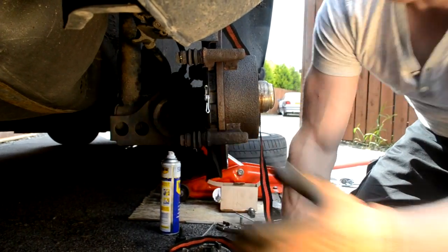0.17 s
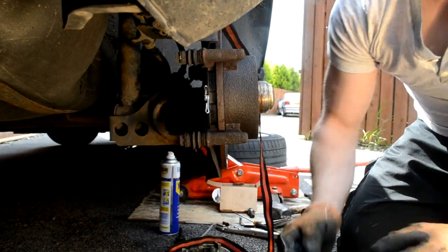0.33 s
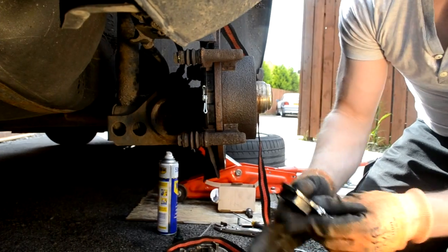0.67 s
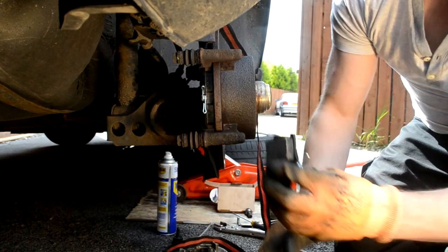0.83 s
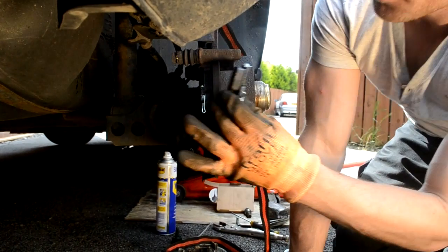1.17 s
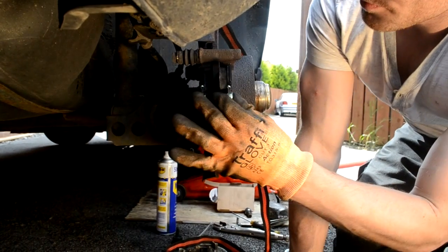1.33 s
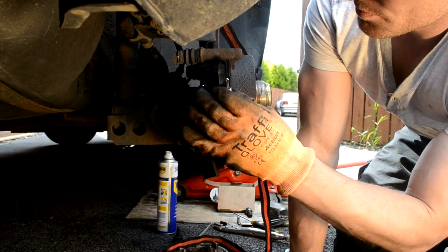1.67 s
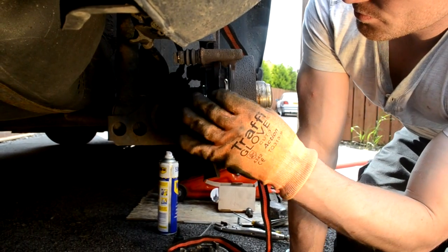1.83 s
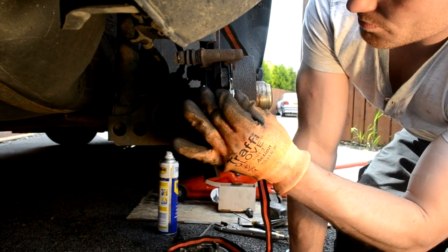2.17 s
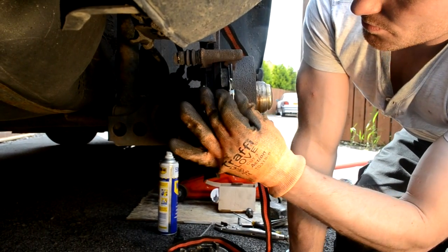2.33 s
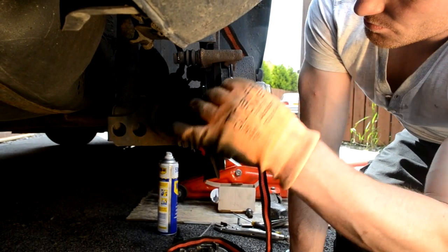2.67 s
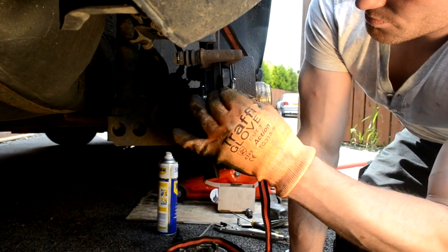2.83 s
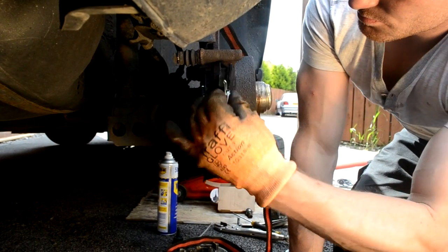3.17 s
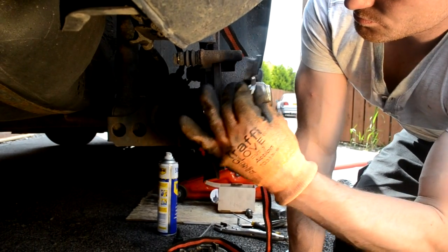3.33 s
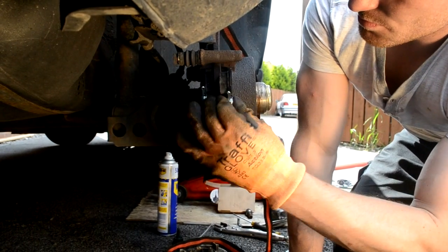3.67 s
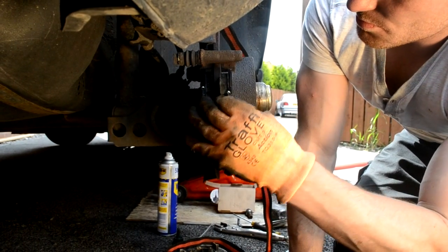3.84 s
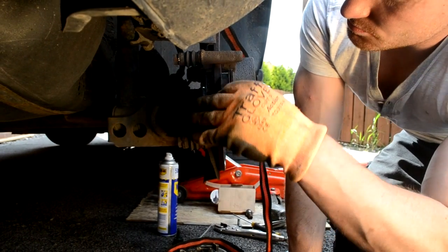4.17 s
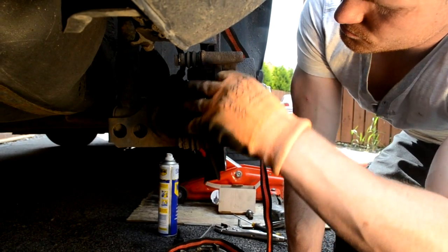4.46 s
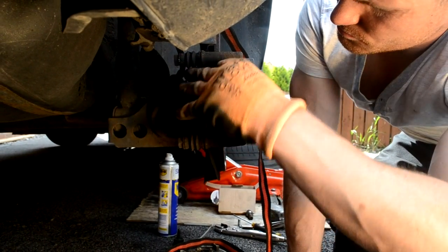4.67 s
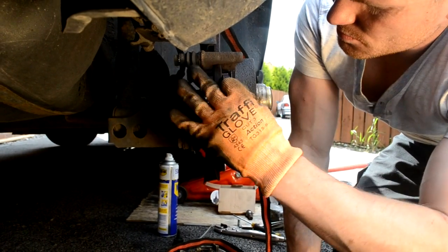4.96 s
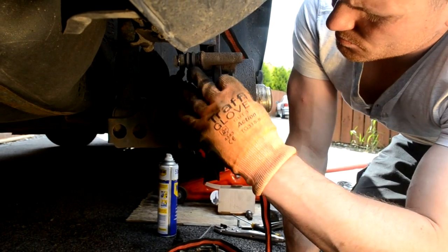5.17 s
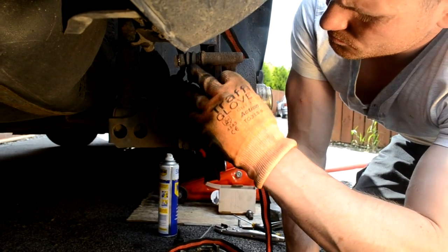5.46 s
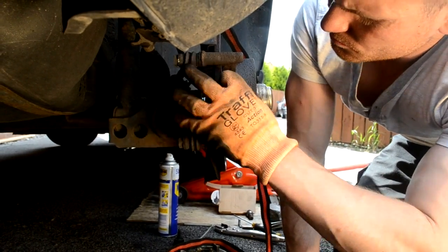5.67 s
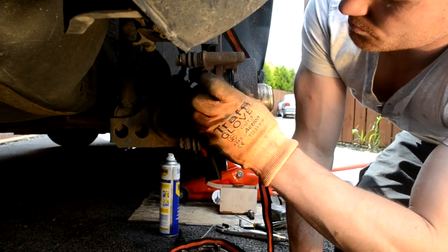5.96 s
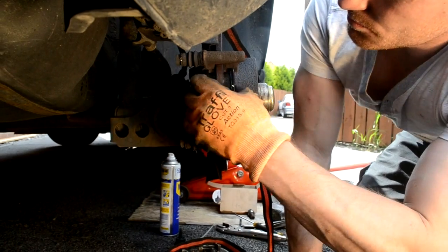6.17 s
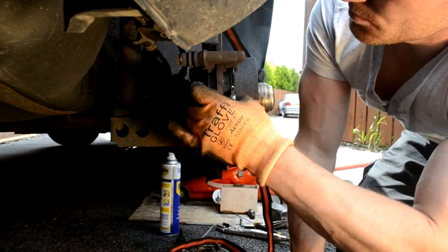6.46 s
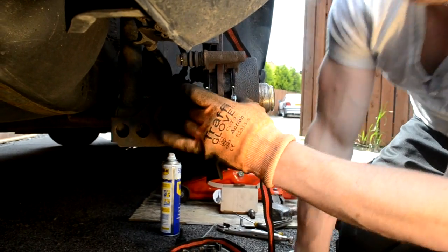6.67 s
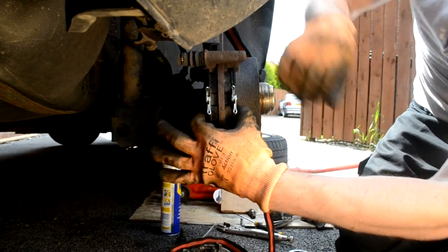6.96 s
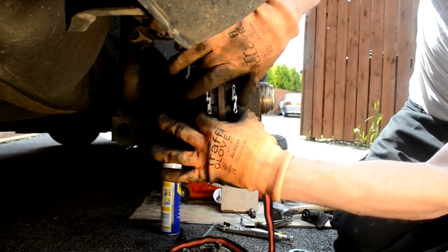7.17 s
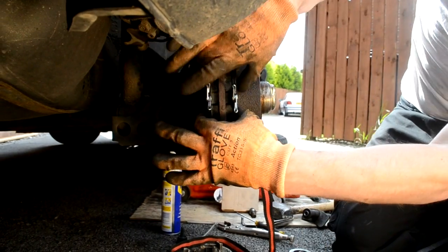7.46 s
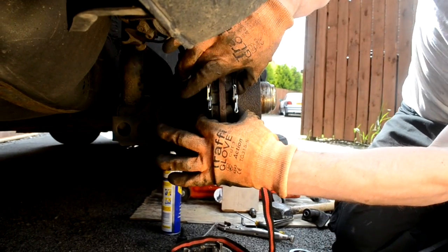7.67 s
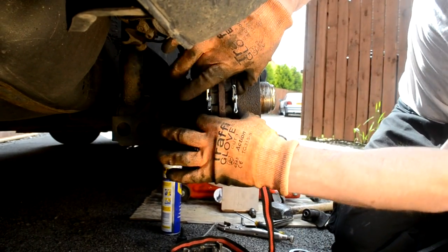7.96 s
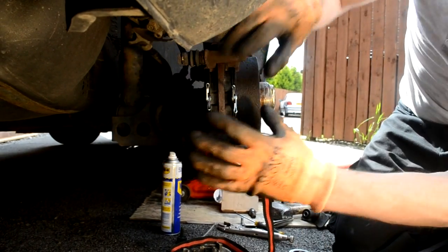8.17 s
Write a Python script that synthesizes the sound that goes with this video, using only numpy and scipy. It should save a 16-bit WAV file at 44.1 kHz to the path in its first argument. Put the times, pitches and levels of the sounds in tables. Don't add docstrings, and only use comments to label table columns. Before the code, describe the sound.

Brake pads clink, scrape and knock into a cast iron carrier in short groups, then a spring clip snaps loudly, with birdsong and faint suburban hum.

```python
import sys
import numpy as np
from scipy import signal
from scipy.fft import rfft, irfft, next_fast_len
from scipy.io import wavfile
from scipy.ndimage import uniform_filter1d, map_coordinates

SR = 44100
rng = np.random.default_rng(int(sys.argv[2]) if len(sys.argv) > 2 else 0)


def gain_from_db(level_db):
    decades = np.asarray(level_db, float) / 20
    return 10 ** decades


def persist_wave(psi):
    counts = np.round(np.clip(psi, -1, 1) * 32767).astype(np.int16)
    wavfile.write(sys.argv[1], SR, np.atleast_2d(counts).T)


N = 366471


def unit(x):
    return x / np.sqrt(np.mean(x ** 2) + 1e-20)


def along(points, hz):
    f, v = np.transpose(points)
    return np.interp(np.log(hz + 1), np.log(f + 1), v)


def wobble(rate):
    knots = rng.standard_normal(int(N * rate / SR) + 4)
    return map_coordinates(knots, [np.arange(N) * rate / SR])


def bumps(rows, steep):
    t = np.arange(0, N + 16, 16) / SR
    swell = np.zeros(len(t))
    for s, length, db in rows:
        swell += gain_from_db(db) * np.exp(-(steep * (t - s) / length) ** 4)
    return np.interp(np.arange(N) / SR, t, swell)


def coloured(x, spectrum):
    m = next_fast_len(len(x) + 8192)
    gain = gain_from_db(along(spectrum, np.fft.rfftfreq(m, 1 / SR)))
    return unit(irfft(rfft(x, m) * gain, m)[:len(x)])


def band(x, low_hz, high_hz):
    edges = [low_hz, min(high_hz, 20000)]
    return signal.sosfilt(signal.butter(4, edges, "band", fs=SR, output="sos"), x)


def rush(spectrum, patchy_db, grain_db):
    noise = rng.standard_normal(N) * gain_from_db(grain_db * wobble(700))
    z = signal.stft(noise, nperseg=512)[2]
    field = uniform_filter1d(rng.standard_normal(z.shape), 6, 0)
    field = uniform_filter1d(field, 10, 1)
    patchy = signal.istft(z * gain_from_db(patchy_db * unit(field)), nperseg=512)[1]
    return coloured(patchy[:N], spectrum)


def add(track, s, sound, db):
    part = track[max(round(s * SR), 0):][:len(sound)]
    part += gain_from_db(db) * sound[:len(part)] / np.abs(sound).max()


def grit(grind, rough_db):
    u = np.arange(round(5 * grind * SR)) / SR / grind
    spikes = rng.standard_normal(len(u) // 40 + 1).repeat(40)[:len(u)]
    envelope = np.minimum(3 * u, 1) ** 1.4 * gain_from_db(-26 * np.maximum(u - .7, 0))
    return rng.standard_normal(len(u)) * gain_from_db(rough_db * spikes) * envelope


def ring(modes, force, treble_db, corner_hz, spread_db, damp):
    hz, db, t60 = np.transpose(modes)[:, :, None]
    t60 = t60 * damp
    t = np.arange(round(min(.36, t60.max()) * SR)) / SR
    luck = rng.standard_normal((2, len(modes), 1))
    hz = hz * (1 + .002 * luck[1])
    bins = np.round(hz / 2).astype(int)
    push = np.abs(rfft(force, SR // 2))[bins] / np.linalg.norm(force)
    tilt_db = treble_db / (1 + (corner_hz / hz) ** 4)
    level = gain_from_db(db + tilt_db + spread_db * luck[0]) / np.maximum(push, .25)
    body = np.sum(level * gain_from_db(-60 * t / t60) * np.sin(2 * np.pi * hz * t), 0)
    fade = (1 - np.exp(-t / .0015)) * np.cos(np.pi / 2 * t / t[-1])
    return signal.fftconvolve(force, body * fade)


def burst(envelope, spectrum):
    n = len(envelope)
    z = rfft(rng.standard_normal(n) * envelope, 2 * n)
    wide = round(2 * n / SR * 350)
    even = irfft(z / np.sqrt(uniform_filter1d(np.abs(z) ** 2, wide)))[:n]
    return coloured(even, spectrum)


def contacts(events, modes, corner_hz, spread_db, damp, dense_db, dense_t60, lift_db, gain_db):
    out, t = np.zeros(N), np.arange(SR // 5) / SR
    hz, db, _ = np.transpose(modes)
    for s, peak_db, treble_db, grind in events:
        force = grit(max(grind, .002), rough_db=2.5)
        treble_db = treble_db + lift_db
        sound = np.zeros(SR)
        add(sound, 0, ring(modes, force, treble_db, corner_hz, spread_db, damp), 0)
        tilted_db = db + treble_db / (1 + (corner_hz / hz) ** 4)
        tone = [(hz[0] * .6, -45), *zip(hz, tilted_db), (12500, -62)]
        fading = gain_from_db(-60 * t / dense_t60) * (1 - np.exp(-t / (0.4 * grind)))
        fed = np.sqrt(np.abs(signal.fftconvolve(force ** 2, fading ** 2)[:len(t)]))
        add(sound, 0, burst(fed, sorted(tone)), dense_db)
        add(out, s - 0.23 * grind, sound, peak_db + gain_db)
    return out


# hz [Hz], density_db [dB per Hz]
SUBURB = [(15, -42.5), (25, -7.5), (131, -2.5), (174, -0.5), (367, -0.5), (682, -1), (1030, -0.5),
          (1480, -11.5), (2480, -15), (2970, -1), (3380, -19), (4380, -10), (4860, -22.5), (9030, -38),
          (12000, -58.5), (15600, -70), (22000, -120)]


def suburb():
    level_db = -59 + 0.16 * wobble(8.1)
    return gain_from_db(level_db) * rush(SUBURB, patchy_db=1.5, grain_db=0.5)


# start_s [s], level_db [dB]
RUB = [(0.0, -62), (1.09, -60.5), (1.76, -64), (5.46, -62.5), (5.78, -51.5), (6.5, -62.5), (7.06, -58.5),
       (8.31, -62.5)]
# middle_s [s], length_s [s], level_db [dB]
STROKES = [(.03, 0.0065, -62), (.095, 0.032, -60.5), (.515, 0.025, -53.5), (.668, 0.0065, -62),
           (5.005, 0.028, -61), (6.885, .005, -57), (6.94, .008, -61), (7.495, 0.012, -61),
           (8.012, 0.0092, -61.5), (8.17, 0.0046, -56), (.46, 0.051, -67), (0.627, 0.032, -55),
           (0.724, 0.023, -62), (1.025, 0.064, -59.5), (1.099, 0.052, -52), (1.261, 0.059, -56),
           (2.043, 0.088, -68), (2.693, 0.042, -58.5), (3.217, 0.057, -62), (4.662, 0.046, -46),
           (4.899, 0.037, -53), (5.66, 0.027, -46.5), (6.134, 0.041, -63), (6.188, 0.029, -52.5),
           (6.266, 0.018, -47.5), (6.439, 0.082, -61), (6.72, 0.12, -52.5), (6.98, 0.12, -64.5),
           (7.252, 0.27, -63), (8.24, 0.014, -52.5)]
# hz [Hz], density_db [dB per Hz]
RUSTLE = [(880, -29), (1500, -5.5), (1940, -4.5), (2220, -2.5), (3580, -7.5), (6090, -10.5), (9490, -18),
          (11200, -33.5), (12500, -68), (16200, -99), (22000, -120)]
# hz [Hz], density_db [dB per Hz]
DRAG = [(290, -40.5), (500, -11), (570, 3), (1340, 6.5), (1890, -2.5), (4000, -14), (5200, -51.5),
        (8800, -120)]


def gloves():
    effort_db = np.interp(np.arange(N) / SR, *np.transpose(RUB))
    rustle_db = -62.5 + 0.92 * (effort_db + 58)
    rustle = gain_from_db(rustle_db) + bumps(STROKES, steep=2.1)
    rustle *= rush(RUSTLE, patchy_db=3.0, grain_db=1.5)
    drag = gain_from_db(effort_db - 1.5) * rush(DRAG, patchy_db=1.5, grain_db=1.5)
    return rustle + drag


# start_s [s], peak_db [dB]
POPS = [(.07, -36.5), (0.187, -36), (0.344, -32), (.37, -34.5), (.392, -36), (0.407, -32.5), (0.648, -38.5),
        (.715, -36.5), (0.842, -29.5), (1.104, -27.5), (1.351, -17.5), (1.559, -31), (3.764, -21.5),
        (3.921, -28.5), (4.095, -30), (4.177, -25), (4.992, -34),]
# middle_s [s], length_s [s], level_db [dB]
GUSTS = [(.42, 0.78, -95), (1.05, 0.96, -62), (4.0, 0.5, -65.5), (5.05, 0.38, -59.5), (7.4, 0.31, -73)]
# hz [Hz], density_db [dB per Hz]
GUST = [(12, -42.5), (20, -7.5), (44, -5), (86, 0), (145, -6), (400, -21), (520, -36), (880, -120)]


def wind():
    calm_db = -71
    lumps = gain_from_db(4 * wobble(22))
    buffeting = unit(lumps * rush(GUST, patchy_db=2.5, grain_db=4.0))
    out = (gain_from_db(calm_db) + bumps(GUSTS, steep=1.6)) * buffeting
    for s, db in POPS:
        hz = 89.7 + 6.1 * (db + 35.5)
        u = np.linspace(0, 3, round(3 * SR / hz))
        add(out, s + 0.01276, np.sin(2 * np.pi * u) * u * np.exp(-3.5 * u), db - 11.5)
    return band(out, low_hz=35, high_hz=900)


# hz [Hz], t60_s [s]
ARCH = [(200, 0.6), (1500, 0.22), (5000, 0.22), (11000, 0.059)]


def arch(x):
    hz, t, z = signal.stft(rng.standard_normal(SR // 2), SR, nperseg=256)
    decay = gain_from_db(-60 * t / along(ARCH, hz)[:, None])
    tail = signal.istft(z * decay, SR, nperseg=256)[1]
    return signal.fftconvolve(np.pad(x, (300, 0)), tail / np.linalg.norm(tail))[:N]


FALL = [(0, 1.4), (.15, 1.3), (.3, 1.0), (.55, .853), (1, .653)]
HOOK = [(0, .96), (.12, 1.05), (.8, .965), (1, 0.85)]
FLICK = [(0, .93), (.35, 1.0), (.48, 1.19), (.62, .91), (1, 0.695)]
SLUR = [(0, 1.13), (.5, 1.0), (1, .96)]
SLIDE = [(0, 1.1), (.6, .97), (1, .92)]
STOOP = [(0, 1.07), (.4, 1.03), (1, .82)]
DIVE = [(0, 1.2), (.5, 1.0), (0.999, .82)]
RISE = [(0, 0.76), (.5, 1.0), (1, 1.16)]
# first_s [s], last_s [s], gap_s [s], pitch_hz [Hz], level_db [dB]
PHRASES = [(FALL, .068, [(.103, .342, .239, 5300, -63), (3.371, 4.388, .203, 5300, -62)]),
           (HOOK, .065, [(5.201, 5.296, .095, 6860, -59), (7.525, 7.915, .195, 7000, -68)]),
           (FLICK, .026, [(6.427, 6.827, .2, 3840, -49)]), (SLUR, .042, [(1.39, 1.48, .09, 6520, -66.5),
           (1.56, 2.07, .0635, 5800, -64), (2.77, 2.99, .22, 5700, -67), (6.04, 6.04, .1, 5400, -63),
           (7.75, 7.995, .061, 5500, -69), ]), (SLIDE, .035, [(5.388, 5.388, .1, 6100, -62),
           (5.52, 5.585, .065, 5800, -62)]), (STOOP, .024, [(5.175, 5.175, .1, 4200, -66),
           (5.328, 5.328, .1, 4200, -60), (5.473, 5.617, .144, 4300, -53)]),
           (DIVE, .025, [(6.301, 6.334, .033, 2880, -54), (6.465, 6.87, .2025, 2680, -55)]),
           (RISE, .022, [(5.902, 5.902, .1, 3340, -58), (5.958, 6.134, .0587, 3340, -53)])]
# start_s [s], length_s [s], pitch_hz [Hz, middle], glide_hz [Hz], level_db [dB]
WHISTLES = [(1.98, .1, 7200, 60.5, -68), (1.98, .09, 6650, 0, -70), (2.4, .11, 12100, -150, -84),
            (2.7, .2, 6100, -100, -75), (2.337, 0.27, 8200, -200, -68.5), (2.325, 0.098, 5150, 0, -67),
            (2.6, 0.15, 7100, -500, -69), (3.244, .09, 2200, 0, -65), (4.726, .15, 9800, -200, -76),
            (6.98, 0.11, 1367, -60, -53.5), (3.7, 0.098, 1900, 144, -58), (2.403, 0.087, 2100, 10, -63.5),
            (2.79, 0.14, 2210, -63, -62), (2.959, 0.085, 5120, -30, -64.5), (3.338, 0.2, 6500, -300, -68),
            (3.56, .2, 6700, -250, -67), (3.78, 0.25, 6700, -250, -67), (3.63, 0.099, 1900, 59, -62.5),
            (3.868, 0.11, 2204, 73, -57), (3.947, 0.089, 2450, 272, -56.5), (4.015, 0.12, 2670, 19, -61),
            (4.683, 0.2, 7860, -400, -61), (4.95, 0.15, 7700, -80, -61)]


def bird_notes():
    notes = []
    for shape, length, phrases in PHRASES:
        for first, last, gap, hz, db in phrases:
            contour = np.transpose(shape) * [[1], [hz]]
            count = round(abs(last - first) / gap) + 1
            notes += [(s, length, db, contour) for s in np.linspace(first, last, count)]
    for s, length, hz, glide, db in WHISTLES:
        notes.append((s, length, db, ([0, 1], [hz - glide / 2, hz + glide / 2])))
    return notes


def birds():
    far_db = -58
    out = np.zeros((2, N))
    for s, length, db, contour in bird_notes():
        u = np.linspace(0, 1, round(length * SR))
        hz = uniform_filter1d(np.interp(u, *contour), len(u) // 10, mode="nearest")
        hz *= 1 + .005 * np.interp(u, np.linspace(0, 1, 40), rng.standard_normal(40))
        note = np.sin(np.pi * u) ** .5 * np.sin(2 * np.pi * np.cumsum(hz) / SR)
        far = np.clip((far_db - db) / 10, .05, .95)
        add(out[0], s, note, db + 10 * np.log10(1 - far))
        add(out[1], s, note, db + 10 * np.log10(far))
    out += .28 * np.roll(out, round(.012 * SR), axis=1)
    return out[0] + gain_from_db(-4.5) * arch(out[1])


# start_s [s], peak_db [dB]
TICKS = [(0.5166, -51), (0.613, -57), (1.1, -44), (1.1226, -27), (1.126, -20.5), (1.139, -18),
         (1.1653, -20.5), (1.15, -26.5), (1.186, -38), (1.197, -37), (4.1895, -41), (6.256, -49),
         (7.4494, -40), (8.15, -40), (8.2353, -47)]
DULL_TICKS = [
    (6.979, -34.5, -38, 0.0027),
    (7.007, -37, -27, 0.0045),
    (7.155, -44, -30, .005),
]
SHIM = [(747, -14, 0.16), (1160, 8.5, 0.016), (1520, -9, 0.0044), (2300, -5.5, 0.011), (3130, -9, 0.015),
        (4570, 1.5, 0.022), (5400, -13.5, 0.048), (7140, -21, 0.039), (8610, 5, 0.011), (9850, -16, 0.012),
        (12000, -56, .01)]


def ticks():
    taps = [(s, db, -10.5 + 0.15 * (db + 19), .0035) for s, db in TICKS]
    out = contacts(taps + DULL_TICKS, SHIM, corner_hz=6500, spread_db=-0.5, damp=0.19,
                   dense_db=2.0, dense_t60=0.015, lift_db=9, gain_db=-4.5)
    return band(out, low_hz=496, high_hz=13400)


# start_s [s], peak_db [dB], upper_modes_db [dB], knock_db [dB], hold_s [s]
CLINKS = [(1.2308, -15.5, -20, -7.5, 0.08), (1.641, -37, 6, -11.5, 0.14), (1.86, -38.5, -4, -12, 0.078),
          (2.025, -34, -55, -39, 0.052), (3.5515, -31.5, -30, -2.5, 0.04), (4.109, -41.5, -42, 1.5, 0.057),
          (4.52, -41, 13, -23, 0.063), (4.71, -22, -19, -1, 0.0086), (4.7165, -15.5, -18, -10.5, 0.038),
          (5.425, -13, -4.5, -8.5, 0.06), (5.9746, -19, -11, 0.5, 0.04), (7.882, -50.5, -15.5, 8, 0.12),
          (8.2957, -36, -78, -5, 0.085)]
# hz [Hz], level_db [dB], t60_s [s]
PLATE = [(1295, 0, .035), (1453, 1, .2), (2058, 0, .3), (2960, 2, .3), (4185, -8, .07), (5640, -15, .2),
         (6605, -36, .1), (7348, -27, .1), (9238, -38, .15)]
# pitch_hz [Hz], level_db [dB], t60_s [s]
CARRIER_HZ = [695, 727, 790, 882, 925, 1090, 1215, 1255, 1530, 1860, 1965, 2060, 2220, 3250]
CARRIER_DB = [-18.5, 12, 1.5, -11.5, -4, -5.5, 0.5, 4, -13.5, -8.5, -8, -8.5, -8.5, -22]
CARRIER_T60 = [.07, .062, .05, .07, .17, .06, .07, .06, .05, .06, .07, .055, .05, .05]
CARRIER = list(zip(CARRIER_HZ, CARRIER_DB, CARRIER_T60))


def clinks():
    out, taps = np.zeros(N), []
    for s, peak_db, upper_db, knock_db, hold in CLINKS:
        force = grit(.0018, rough_db=4)
        plate = ring(PLATE, force, upper_db + 10, corner_hz=4800, spread_db=1, damp=1)
        grip = gain_from_db(-60 * np.maximum(np.arange(len(plate)) / SR - hold, 0) / 0.016)
        add(out, s - .001, plate * grip, peak_db - 8.5)
        taps.append((s, peak_db + knock_db, 0, .003))
    out += contacts(taps, CARRIER, corner_hz=1076, spread_db=-1.5, damp=1.0,
                    dense_db=4.5, dense_t60=0.078, lift_db=15.0, gain_db=-2.0)
    return band(out, low_hz=516, high_hz=9800)


# hz [Hz], level_db [dB], t60_s [s]
KNUCKLE = [(397.4, -29.5, 0.045), (504, -39.5, 0.83)]


def knuckle():
    blows, t = np.zeros(N), np.arange(SR) / SR
    hits = np.array(sorted(row[:2] for row in KNOCKS + CLINKS + SNAP))
    first = np.diff(hits[:, 0], prepend=0) > .024
    for s, db in hits[first]:
        add(blows, s, np.hanning(40), 0.63 * db)
    hum = sum(gain_from_db(db - 60 * t / t60) * np.sin(2 * np.pi * hz * t) for hz, db, t60 in KNUCKLE)
    hum *= 1 - np.exp(-t / 0.0023)
    return signal.fftconvolve(blows, hum / 20)[:N]


# start_s [s], peak_db [dB], treble_db [dB], bridge_modes_db [dB], scrape_s [s]
KNOCKS = [(1.318, -23, 6, 0, 0.0061), (1.325, -18, -6.5, -2, 0.0094), (1.341, -28, -17, -2, 0.0083),
          (1.9075, -6, -13, 7, 0.0056), (1.913, -8, 1, 7.5, 0.0051), (1.921, -13.5, -2.5, -2, 0.0055),
          (1.933, -17.5, -10, 11, 0.0057), (1.95, -27.5, -3, 5, 0.0063), (2.064, -11.5, -3.5, 5.5, .007),
          (2.074, -13, 4, -1.5, .007), (2.086, -23, -6, 2, 0.0065), (2.107, -37, 4.5, -5, 0.0058),
          (3.196, -29, -7, 3, 0.01205), (3.214, -24, -9, 0, .016), (3.599, -25.5, -1, 4, 0.0076),
          (3.678, -21, -7, 8, 0.014), (3.778, -27, -13, -2, 0.013), (4.516, -39.5, 4, 1, 0.022),
          (4.542, -26.5, -22.5, -11, 0.026), (4.632, -17.5, -21, -1.5, 0.024),
          (4.663, -7.5, -0.5, -2, 0.0054), (4.671, -9, -3.5, -9.5, 0.0062), (4.687, -19.5, -11, -3, 0.0049),
          (4.902, -9, 12.5, -7, 0.0048), (4.91, -11, 6, -6, .007), (4.924, -16, -10.5, -4, 0.0061),
          (5.007, -14, -16, -8.5, 0.0086), (5.026, -23, -27, -11, 0.0066), (5.32, -42.5, -18, -7, 0.039),
          (5.355, -38.5, -34, -2, 0.016), (5.508, -29, -40.5, -6, 0.015), (5.649, -22, -17, -3, 0.018),
          (6.171, -23.5, 3, 2, .012), (6.188, -16, 18, -7, 0.014), (6.26, -23.5, -6, 1, 0.018),
          (6.41, -26, -47.5, -5.5, 0.013), (6.44, -57, -31.5, -8, 0.016), (6.801, -45, -31, -8, .016)]


def knocks():
    bridge_hz, bridge_octaves = 1213, 0.26
    bridge = np.exp(-(np.log2(np.divide(CARRIER_HZ, bridge_hz)) / bridge_octaves) ** 2)
    out = np.zeros(N)
    for s, db, treble_db, bridge_db, grind in KNOCKS:
        modes = np.transpose([CARRIER_HZ, CARRIER_DB + bridge_db * bridge, CARRIER_T60])
        out += contacts([(s, db, treble_db, grind)], modes, corner_hz=1670, spread_db=2.0, damp=1.0,
                        dense_db=-6, dense_t60=0.048, lift_db=8.0, gain_db=-2.0)
    return band(out, low_hz=640, high_hz=4600)


# start_s [s], pitch_hz [Hz], level_db
# [dB], free_s [s]
SINGLE_MODES = [(1.909, 1245, -18, 0.01), (2.067, 729, -19, 0.023), (3.213, 925, -34.5, .035),
                (4.666, 726, -18, 0.012), (4.905, 730, -21, .022), (5.009, 730, -26.5, .014),
                (5.8, 1976, -36.5, .04), (1.885, 1453, -47.5, .02), (3.552, 1453, -39.5, 0.035),
                (2.07, 600, -42.5, .42), (1.993, 1455, -45, .02), (1.645, 9238, -72, 0.0593),
                (1.645, 10230, -81, .06), (5.976, 2958, -32, 0.058), (5.985, 4185, -50, 0.037),
                (4.716, 2958, -36, 0.035), (4.72, 2070, -41.5, 0.1), (5.016, 506, -42, 0.14),
                (5.725, 399, -34.5, 0.026), (5.745, 644.8, -29.5, 0.11)]


def single_modes():
    out, t = np.zeros(N), np.arange(SR * 2 // 3) / SR
    grip_db_per_s = 800
    for s, hz, db, free in SINGLE_MODES:
        t60 = 0.8 * (650 / hz) ** .7
        decay = gain_from_db(-60 * t / t60 - grip_db_per_s * np.maximum(t - free, 0))
        add(out, s, decay * np.sin(2 * np.pi * hz * t) * (1 - np.exp(-t / 0.004)), db)
    return out


# start_s [s], peak_db [dB], treble_db [dB], rattle_s [s]
SNAP = [
    (5.7223, -2, -16, 0.005),
]
CRACK = [(24, -75), (40, -27), (200, -27), (667, -13.5), (943, -24.5), (1210, 0), (1710, -4.5), (1980, -6),
         (3320, -1), (3850, 3.5), (5050, -10.5), (9140, -15.5), (14600, -67.5)]
# pitch_hz [Hz], level_db [dB], t60_s [s]
DISC_HZ = [646, 926, 996, 1249, 1443, 1523, 1955, 1977, 2203, 2331, 2715, 2955, 3241, 3538, 3747, 3908,
           4173, 4433, 5120, 8495, 4091, 3849, 3655, 2912]
DISC_DB = [-17.5, -14.5, -26, -9.5, -17, -21.5, -5.5, -8.5, -11, -12, -12.5, -4, -9, -7.5, -7.5, 2, -1, -10,
           -15.5, -25, -2, -6, -16.5, -11.5]
DISC_T60 = [.5, .28, .3, .16, .5, .21, .15, .3, .15, .12, .17, .18, .13, .14, .16, .13, .14, .1, .1, .12,
            .13, .2, .27, .4]
DISC = list(zip(DISC_HZ, DISC_DB, DISC_T60))


def snap():
    out = contacts(SNAP, DISC, corner_hz=3030, spread_db=0, damp=1.0,
                   dense_db=0.5, dense_t60=0.27, lift_db=-4.0, gain_db=-6.0)
    out = band(out, low_hz=332.7, high_hz=9500)
    s, peak_db = SNAP[0][:2]
    t = np.arange(SR // 8) / SR
    crack = burst(np.minimum(t / 0.0015, 1) * gain_from_db(-60 * t / 0.045), CRACK)
    slip = band(crack, low_hz=500, high_hz=2500)[:SR // 300]
    add(out, s - .0042, slip, peak_db - 22)
    add(out, s - .0015, crack, peak_db + 6)
    return out


# start_s [s], peak_db [dB], treble_db [dB], press_s [s]
THUMPS = [
    (7.327, -22.5, -10, 0.0026),
    (7.331, -22, -27, 0.00624),
    (7.581, -41, -37, 0.00673),
]
# hz [Hz], level_db [dB], t60_s [s]
HUB = [(173.5, -9.5, 0.28), (286, -7.5, 0.17), (414, -8.5, 0.4), (535, -5.5, 0.34), (612, -3, 0.27),
       (794, 2, 0.25), (950, 6, 0.059), (1128, 9, 0.068), (1248, 11.5, 0.095), (1370, 1, 0.055),
       (1670, -0.5, 0.056), (1780, -2, 0.053), (2320, -14, .05), (2470, -18, .04)]


def thumps():
    out = contacts(THUMPS, HUB, corner_hz=1490, spread_db=-1.5, damp=0.46,
                   dense_db=6, dense_t60=0.031, lift_db=2.0, gain_db=6.0)
    return band(out, low_hz=119, high_hz=3040)


def scene():
    steel = ticks() + clinks() + knuckle() + knocks() + single_modes() + snap() + thumps()
    outdoors = suburb() + gloves() + wind() + birds()
    return (outdoors + steel + gain_from_db(-17) * arch(steel))[None]


def filtered(x, spectrum):
    m = next_fast_len(N)
    gain = gain_from_db(along(spectrum, np.fft.rfftfreq(m, 1 / SR)))
    return irfft(rfft(x, m) * gain, m)[:, :N]


# hz [Hz], level_db [dB]
PORT = [(2820, 2), (3000, -1), (3180, 2), (4150, 2), (4320, 1.5), (4950, 0.5), (5600, 2), (7300, 1.5),
        (7950, -4.5), (8800, 1)]


def port(x):
    return filtered(x, PORT)


# hz [Hz], level_db [dB]
CONVERTER = [(10500, 0), (12500, -7), (15000, -4.5)]


def input_stage(x):
    return filtered(x / (1 + np.abs(x) ** 8) ** (1 / 8), CONVERTER)


def roll_off(x):
    return signal.sosfilt(signal.butter(12, 14760, fs=SR, output="sos"), x)


def record(dry):
    return roll_off(input_stage(port(dry)))


dry = scene()
out = record(dry)
persist_wave(out)
```